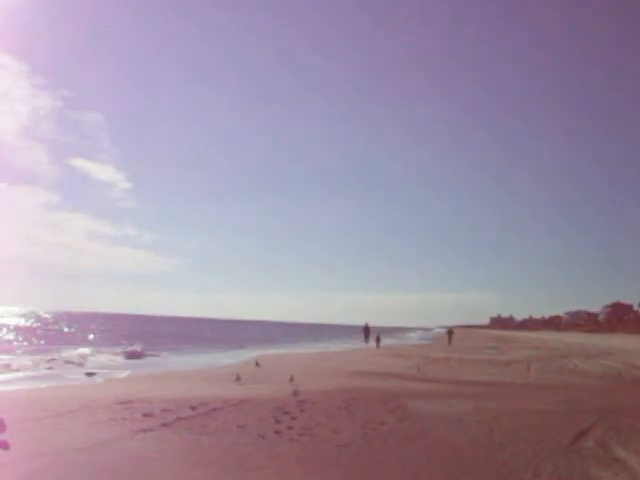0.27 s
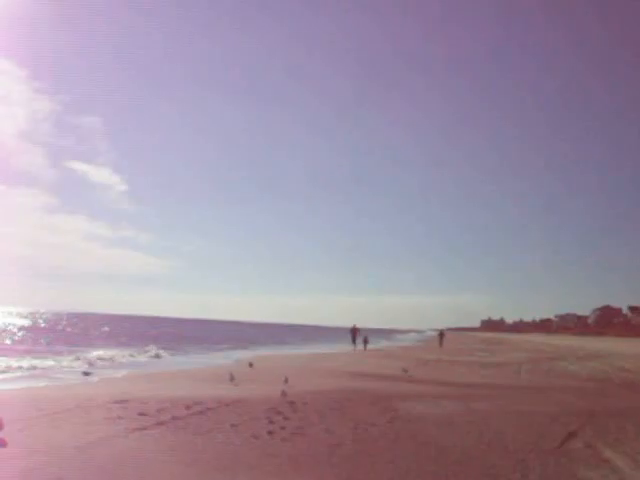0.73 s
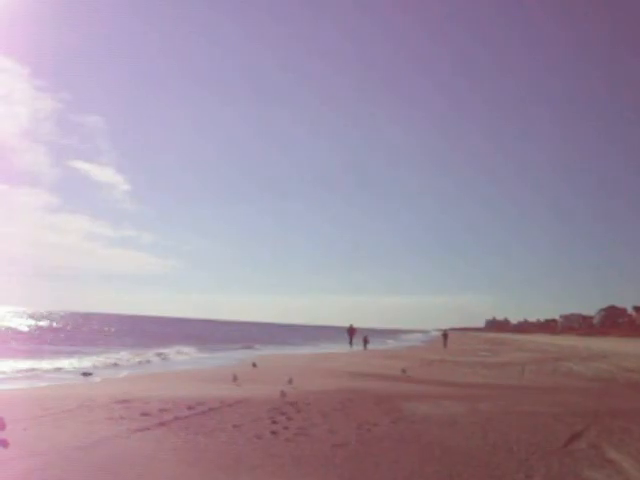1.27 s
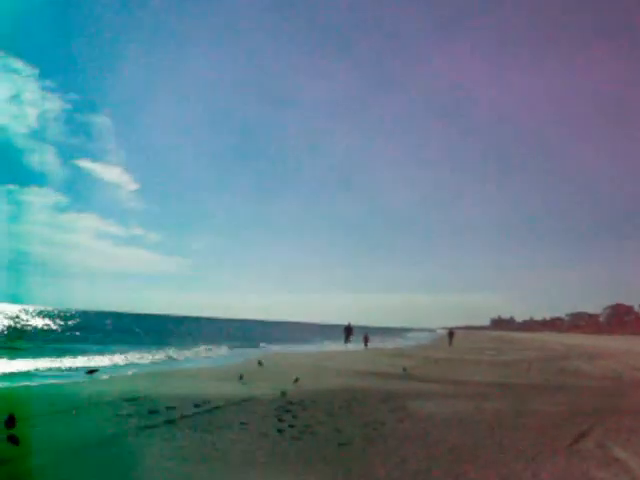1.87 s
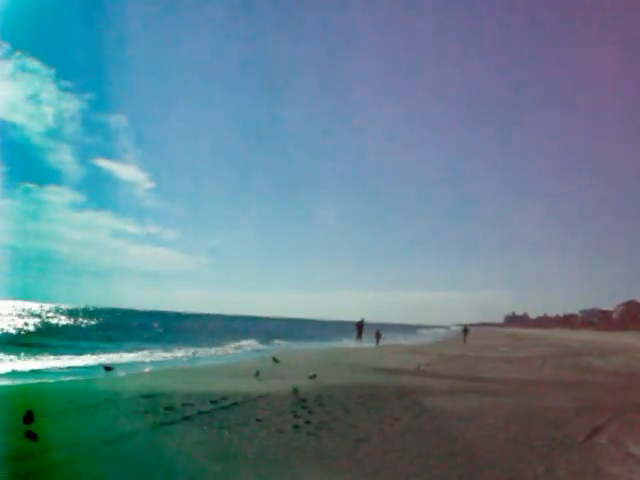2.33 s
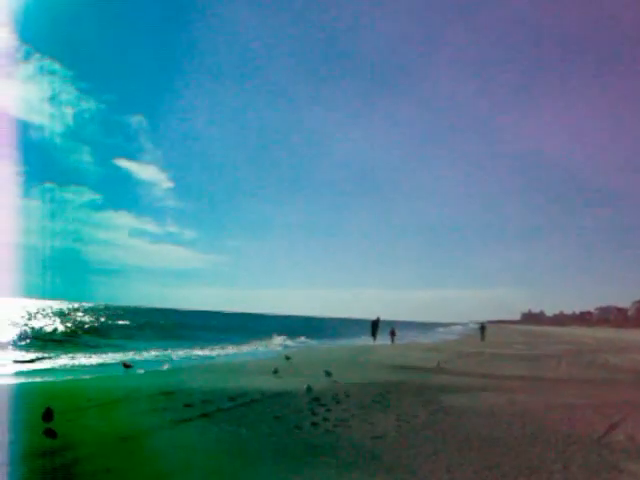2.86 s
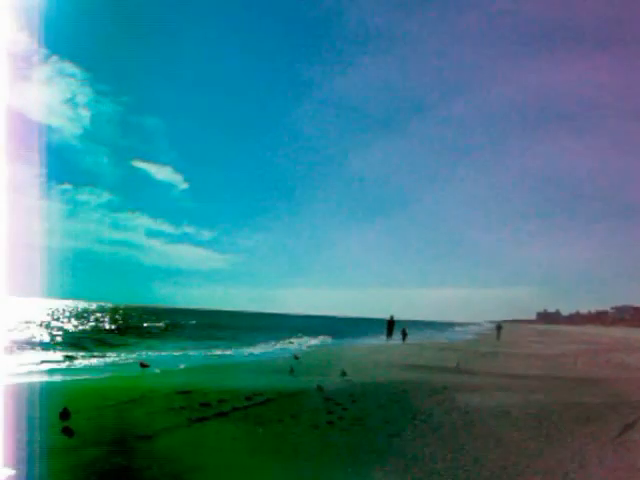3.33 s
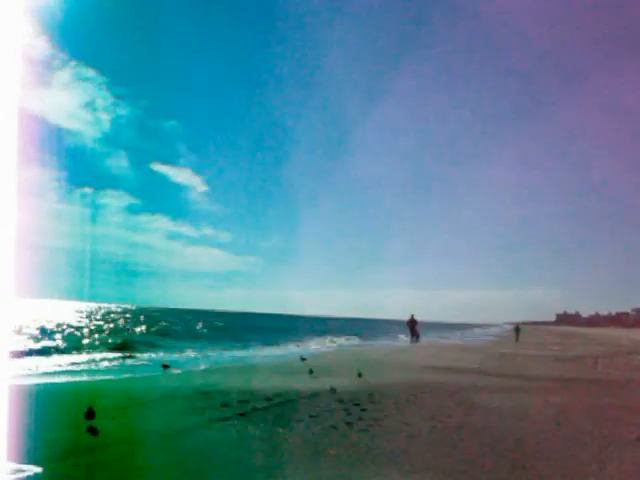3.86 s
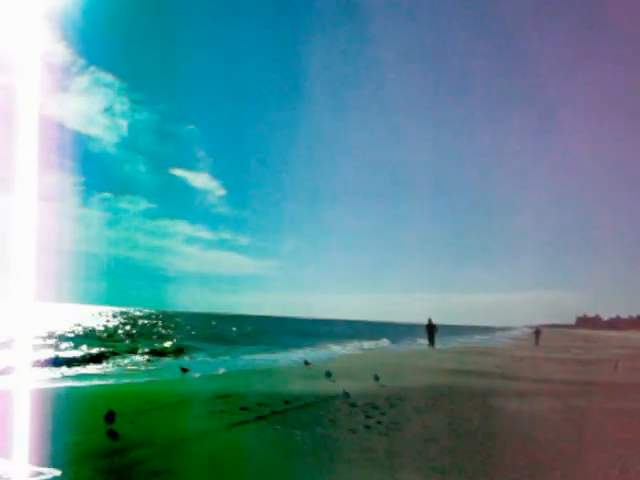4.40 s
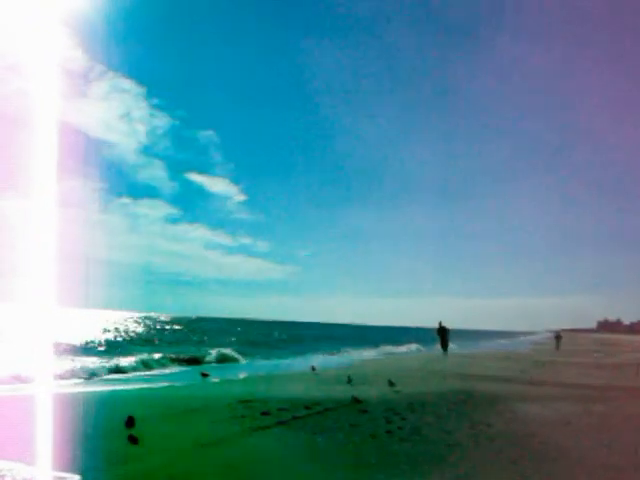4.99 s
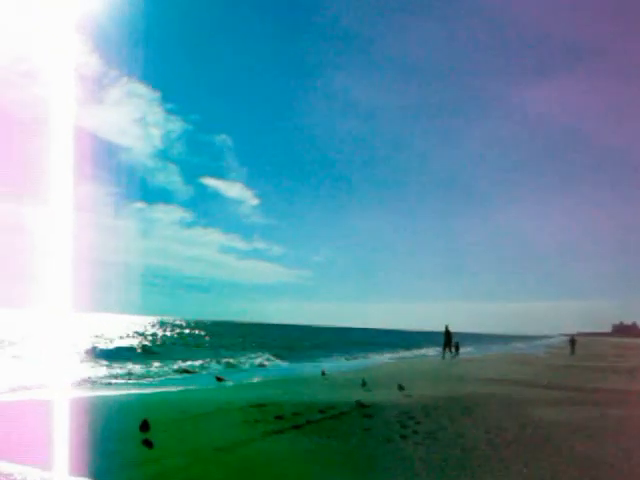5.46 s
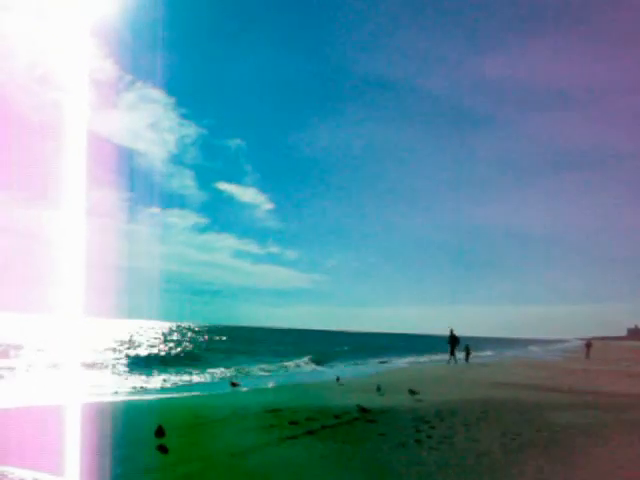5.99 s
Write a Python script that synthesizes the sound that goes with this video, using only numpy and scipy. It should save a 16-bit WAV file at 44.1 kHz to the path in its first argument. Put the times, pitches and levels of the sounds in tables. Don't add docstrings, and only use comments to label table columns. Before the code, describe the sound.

Low wind buffeting and knocks over foamy waves that ebb, then swell again with bubbly splashes; two brief, high bird calls pass.

```python
import sys
import numpy as np
from scipy import signal
from scipy.fft import rfft, irfft
from scipy.io import wavfile
from scipy.ndimage import uniform_filter1d

SR = 44100
rng = np.random.default_rng(int(sys.argv[2]) if len(sys.argv) > 2 else 0)


def voltage_ratio(decibels):
    exponent = np.asarray(decibels, float) / 20
    return 10 ** exponent


def master(y):
    cut = np.clip(np.atleast_2d(y).T, -1, 1)
    pcm = np.round(cut * 32767)
    wavfile.write(sys.argv[1], SR, pcm.astype(np.int16))


N = 274280

# time in s, force of the wave in dB, gurgle of the backwash in dB.
WAVES = [(0, -22.5, 2), (.4, -25.5, -2.5), (.62, -22, 3), (.95, -27.5, 2), (1.35, -31, -2),
         (2.0, -32.5, -2), (2.6, -34, -1), (2.95, -34.5, 1), (3.45, -30, 2.5), (3.9, -32, 3),
         (4.33, -29.5, 2), (4.602, -23.5, 3), (4.9, -21, 1.5), (5.25, -19.5, 0.5), (5.55, -21, 1),
         (5.68, -23, -3.5), (5.9, -17.5, 3.5), (6.22, -21, 1)]
# low edge in Hz, high edge in Hz.
SURF_BANDS_HZ = [(280, 600), (700, 1300), (2200, 3400), (4900, 5400)]
# level in dB at middle force, share of force followed, share of gurgle followed.
BAND_RESPONSES = [
    (-30, 1.01, -.8),
    (-31, 0.95, .5),
    (-39, 1.084, -.3),
    (-51.5, 0.65, 0.1),
]
# frequency in Hz, density in dB per Hz.
FOAM_COLOUR = [(65, -37), (110, -3.5), (130, -4), (171, 1), (258, -2.5), (357, -2.5), (797, -10),
               (1090, -9), (1530, -18.5), (2090, -14), (2510, -17.5), (3260, -16.5), (3710, -24.5),
               (4990, -34), (5500, -36.5), (7150, -71), (12100, -120)]
# time in s, lift in dB, centre in Hz, length in s, spread in octaves.
SLAPS = [(0.08, 1, 1200, 0.086, 1.1), (0.572, -3.5, 1200, 0.27, 0.83), (1.2, 2.5, 300, .1, 0.84),
         (1.957, 6, 800, .1, .7), (5.088, 1, 250, 0.29, 0.73), (2.846, 3, 2000, 0.11, 1.1),
         (3.025, 4.5, 1800, 0.17, 1.9), (3.374, 3, 2500, 0.13, 1.46), (3.708, 3, 1500, 0.082, 1.3),
         (4.103, 3.5, 3000, 0.2, 1), (4.41, 6.5, 3500, 0.18, 1.3), (5.425, 7.5, 4770, 0.15, 0.49),
         (5.48, 4.5, 4800, 0.083, 0.42), (5.766, 2, 2500, .08, 0.73), (5.99, 3, 2600, 0.084, 0.87),
         (6.1, 3, 900, 0.12, .8), (5.12, 1, 3000, 0.13, 0.47), (0.022, 2.5, 3270, 0.31, 0.55),
         (4.57, 3, 2500, 0.056, 0.73), (6.06, 2.5, 150, .15, 0.54), (3.47, 0.5, 1500, 0.065, 1)]
# time in s, peak
# in dB, length in s, sharpness of the buffeting in dB.
GUSTS = [(0.058, -18.5, 0.21, 1.5), (0.388, -17.5, 0.084, 0.5), (0.565, -19.5, 0.1, -1),
         (0.695, -16, .08, -16), (0.854, -16.5, 0.061, -4.5), (1.141, -13.5, 0.051, -2.5),
         (1.22, -20, 0.095, 5), (1.403, -24.5, .14, -1), (1.551, -16.5, 0.034, -13),
         (1.74, -22.5, .18, -9.5), (1.95, -24.5, 0.15, -2.5), (2.182, -23, 0.049, -6),
         (2.32, -21, .05, -3.5), (2.59, -25.5, 0.1, -11), (2.716, -21, 0.054, -3),
         (2.831, -18.5, .05, -4.5), (2.952, -20, 0.047, -5), (3.085, -21, 0.087, -4.5),
         (3.284, -21, 0.1, -5), (3.475, -13.5, 0.052, -9), (3.77, -22, .1, -11), (3.95, -20.5, 0.14, -12.5),
         (4.042, -9, 0.025, -15), (4.193, -12, 0.033, -21), (4.651, -16, 0.16, -3.5),
         (5.04, -20, 0.034, -7), (5.206, -30, 0.39, 6.5), (5.479, -15, 0.1, -4), (5.662, -14.5, 0.11, 0),
         (6.08, -23.5, 0.52, 2.5)]
# frequency in Hz, density in dB per Hz.
WIND_COLOUR = [(3, -39.5), (8, 2), (25, 3.5), (60, -3.5), (120, -9.5), (250, -24), (500, -44.5),
               (1500, -110)]
# time in s, peak in dB, pitch in Hz, length in cycles.
BUFFETS = [(0.369, -4, 64, 0.87), (0.858, -21, 62.4, 0.68), (1.194, -1, 124, 1.27), (1.213, -0.5, 106, 1.2),
           (1.279, -25, 98, 1.1), (2.838, -26, 145, 0.79), (3.47, -20, 88.8, 1.6),
           (4.031, -7.5, 75.4, 2.06), (4.643, -4.5, 61.9, 1.7), (5.501, -11, 70.0, 1.5),
           (5.608, -4, 70, 1.4), (5.629, 0, 105, 0.5), (5.664, -2.5, 61.9, 1.3)]
# time in s, peak in dB, pitch in Hz, slosh in dB, spray in dB.
SPLASHES = [(0.02, -20, 870, -14, -35), (1.969, -22, 802, -34, -30), (3.054, -12, 840, -6, -17.5),
            (3.07, -10, 990, -9, -17), (3.176, -14, 1120, -9, -29), (3.398, -13.5, 800, -5, -13),
            (3.405, -10.5, 1130, -27, -11.5), (3.474, -10.5, 970, -20, -19), (3.555, -13, 1070, -17, -23),
            (3.699, -13, 1140, -15, -18), (3.853, -15, 956, -9, -31), (3.989, -12, 870, -11, -13),
            (4.547, -10, 1100, -19, -35), (5.701, -8, 912, -15, -25), (5.759, -6.5, 780, 1, -39),
            (5.914, -2, 840, -25, -41), (6.057, -1.5, 926, -18, -35)]
# start in s, length in s, pitch in Hz, level in dB, glide in Hz.
NOTES = [
    (1.592, 0.041, 3630, -31, -8),
    (1.632, 0.0834, 3810, -30.5, -70),
    (1.714, 0.096, 4580, -34.5, 94),
    (1.788, 0.031, 4000, -45, -120),
    (1.802, 0.16, 3880, -34, -90),
    (3.965, 0.054, 3590, -34.5, -200),
    (4.014, .078, 3940, -19, -95),
    (4.088, .125, 4703, -36.5, 45),
    (4.17, 0.042, 4120, -35.5, -61.5),
    (4.194, 0.15, 3946, -24.5, -175),
]
# flick at the start in Hz, its time in s, flick at the end in Hz, its time in s.
BENDS = [
    (16.2, .005, 254, 0.0029),
    (260, 0.012, 417, .007),
    (45, .008, 50, 0.016),
    (30, .006, -20, .006),
    (70, .015, -230, 0.032),
]
# rise in s, fade in s, sag in dB, octave below in dB.
SWELLS = [
    (.012, 0.0084, -10, -26),
    (0.014, 0.011, 1.5, -12),
    (.006, 0.011, 9.5, -34),
    (.012, .008, -4, -33),
    (0.029, 0.081, -4, -32),
]
# time in s, peak in dB, rise in s, fall in s, tail in dB, tail in s.
THUMPS = [
    (4.6807, -6, 0.001, .0008, -17, 0.0021),
    (5.59375, 4, 0.00085, 0.00042, -11.5, 0.002),
]
# time in s, depth in dB, recovery in s.
GAIN_DIPS = [
    (4.681, 12.5, 0.012),
    (5.5945, 7.5, 0.029),
    (3.1, 0.5, 0.047),
]
OVERFLOWS_S = (5.59338, 5.59392)


def evened(x):
    return x / np.sqrt(np.mean(x ** 2) + 1e-20)


def levelled(x, width):
    power = uniform_filter1d(uniform_filter1d(x ** 2, int(width)), int(width))
    return x / np.sqrt(power + 0.055)


def read(points, hz):
    f, value = np.transpose(points)
    return np.interp(np.log(hz + 1), np.log(f + 1), value)


def add(mix, start_s, sound):
    part = mix[round(start_s * SR):][:len(sound)]
    part += sound[:len(part)]


def drift(shape, *widths):
    x = rng.standard_normal(shape)
    for axis, width in enumerate(widths):
        for _ in range(2):
            x = uniform_filter1d(x, int(width), axis)
    return evened(x)


def noise(field_db, size):
    z = rng.standard_normal(field_db.shape) + 1j * rng.standard_normal(field_db.shape)
    return signal.istft((z * voltage_ratio(field_db)).T, nperseg=size, noverlap=size * 3 // 4)[1][:N]


def bubble(hz, cycles, glide=0.21):
    u = np.arange(int(3 * cycles * SR / hz)) * hz / SR
    envelope = (1 - np.exp(-u * 3)) * np.exp(-u / cycles * 2)
    return envelope * np.sin(2 * np.pi * (u + glide * u ** 2 / cycles / 2))


def foam_swell(t, hz, colour_db):
    middle_db, slap_rise_s = -28, 0.014
    wave_s, force_db, gurgle_db = np.transpose(WAVES)
    courses = []
    for (low_hz, high_hz), (db, force_share, gurgle_share) in zip(SURF_BANDS_HZ, BAND_RESPONSES):
        level_db = db + force_share * (force_db - middle_db) + gurgle_share * gurgle_db
        inside = (hz >= low_hz) & (hz < high_hz)
        own_power = np.sum(voltage_ratio(2 * colour_db[inside])) * (high_hz - low_hz) / np.sum(inside)
        courses.append(np.interp(t, wave_s, level_db - 10 * np.log10(own_power)))
    centres_hz = np.sqrt(np.prod(SURF_BANDS_HZ, axis=1))
    share = np.array([read(np.c_[centres_hz, row], hz) for row in np.eye(len(centres_hz))])
    swell_db = np.array(courses).T @ share
    for start_s, lift_db, centre_hz, length_s, octaves in SLAPS:
        rise = np.clip((t - start_s) / slap_rise_s + 1, 0, 1)
        shape = rise * np.exp(-(np.maximum(t - start_s, 0) / length_s) ** 3)
        spread = np.exp(-(np.log2((hz + 1) / centre_hz) / octaves) ** 2)
        swell_db += lift_db * np.outer(shape, spread)
    return swell_db


def surf(patchy_db=-0.5, flicker_db=0.05, grain_db=-9.0, grains_per_s=150, grain_spread_db=2.0):
    frames, hz = N // 128 + 5, np.fft.rfftfreq(512, 1 / SR)
    t = np.arange(frames) * 128 / SR
    colour_db = np.where(hz < SR / 8, read(FOAM_COLOUR, hz), -120)
    swell_db = foam_swell(t, hz, colour_db)
    patches_db = patchy_db * drift((frames, len(hz)), 12, 3.5)
    flicker = flicker_db * drift((frames, len(hz)), 2.6, 22)
    foam = evened(noise(patches_db + flicker, size=512))
    for pitch_hz in np.geomspace(500, 4800, 24):
        bursts = rng.random(N) < grains_per_s / 24 / SR
        sizes = voltage_ratio(grain_spread_db * np.minimum(rng.exponential(1, N), 4)) * bursts
        foam += voltage_ratio(grain_db) * signal.oaconvolve(sizes, bubble(pitch_hz, 4.4))[:N]
    z = signal.stft(foam, nperseg=512, noverlap=384)[2]
    z *= voltage_ratio(colour_db + swell_db[:z.shape[1]]).T * np.sqrt(SR / 2)
    return signal.istft(z, nperseg=512, noverlap=384)[1][:N]


def wind(lumps_db=3.0, split_hz=60.0, buffet_db=-2.0):
    gust_edge_db, breeze_db, flutter_db = 4.5, -32.5, -35
    hz, t = np.fft.rfftfreq(N, 1 / SR), np.arange(N) / SR
    z = rfft(rng.standard_normal(N)) * voltage_ratio(read(WIND_COLOUR, hz))
    upper = 1 / (1 + (split_hz / (hz + 1)) ** 6)
    low = levelled(evened(irfft(z * (1 - upper), N)), 1200)
    high = levelled(evened(irfft(z * upper, N)), 1200)
    lumps = voltage_ratio(lumps_db * drift(N, 790))
    push, flutter = voltage_ratio(2 * breeze_db), voltage_ratio(2 * flutter_db)
    for s, db, length_s, sharp_db in GUSTS:
        power = voltage_ratio(2 * (db - gust_edge_db * abs(2 * (t - s) / length_s) ** 1.3))
        push = push + power
        flutter = flutter + power * voltage_ratio(2 * sharp_db)
    out = np.sqrt(push) * low + np.sqrt(flutter) * evened(high * lumps)
    for s, db, pitch_hz, cycles in BUFFETS:
        u = np.arange(int(cycles * SR / pitch_hz)) * pitch_hz / SR
        under = out[round(s * SR):][:len(u)]
        kick = voltage_ratio(db + buffet_db) * np.cos(2 * np.pi * u)
        add(out, s, np.hanning(len(u)) * (kick - under))
    return out


def splashes():
    out, t = np.zeros(N), np.arange(900) / SR
    dull = signal.butter(5, [600, 3300], "band", fs=SR, output="sos")
    bright = signal.butter(4, [3600, 5200], "band", fs=SR, output="sos")
    envelope = (1 - np.exp(-t / 0.00075)) * np.exp(-t / 0.006)
    for s, db, hz, slosh_db, spray_db in SPLASHES:
        add(out, s, voltage_ratio(db) * bubble(hz, cycles=3.0))
        burst = rng.standard_normal(len(t))
        slosh = voltage_ratio(slosh_db) * evened(signal.sosfilt(dull, burst))
        spray = voltage_ratio(spray_db) * evened(signal.sosfilt(bright, burst))
        add(out, s, voltage_ratio(db - 6.0) * (slosh + spray) * envelope)
    return out


def bird():
    edge_db, waver_db = 16, 0.8
    out = np.zeros(N)
    for note, bend, swell in zip(NOTES, [*BENDS, *BENDS], [*SWELLS, *SWELLS]):
        start_s, length_s, hz, db, glide_hz = note
        in_hz, in_s, out_hz, out_s = bend
        rise_s, fade_s, sag_db, under_db = swell
        t = np.arange(0, length_s, 1 / SR)
        along, left = t / length_s - .5, length_s - t
        flicks_hz = in_hz * np.exp(-t / in_s) + out_hz * np.exp(-left / out_s)
        phase = 2 * np.pi * np.cumsum(hz + glide_hz * along + flicks_hz) / SR
        under = signal.windows.tukey(len(t), .45) * np.linspace(.05, 1.2, len(t)) * np.sin(phase / 2)
        tone = np.sin(phase) + voltage_ratio(under_db) * under
        edges = np.maximum(1 - t / rise_s, 0) ** 2 + np.maximum(1 - left / fade_s, 0) ** 2
        level_db = db + waver_db * drift(len(t), 150) - sag_db * along - edge_db * edges
        add(out, start_s, np.sqrt(2) * voltage_ratio(level_db) * tone * signal.windows.tukey(len(t), .12))
    return out


def shore(x, echo_db=-17.0, t60_s=0.12):
    t = np.arange(SR // 8) / SR
    scattered = rng.standard_normal(len(t)) * (rng.random(len(t)) < .03)
    taps = scattered * voltage_ratio(-60 * t / t60_s) * (t > .004)
    return x + voltage_ratio(echo_db) * signal.oaconvolve(x, taps / np.linalg.norm(taps))[:N]


def thump(s, db, rise_s, fall_s, tail_db, tail_s):
    t = np.arange(N) / SR - s
    after = np.maximum(t, 0)
    tail = voltage_ratio(tail_db)
    settle = (1 - tail) * np.exp(-(after / fall_s) ** 2) + tail * np.exp(-after / tail_s)
    return voltage_ratio(db) * np.exp(np.minimum(t, 0) / rise_s) * settle


def gain_dips_db():
    t = np.arange(N) / SR
    dip_db = np.zeros(N)
    for s, db, recovery_s in GAIN_DIPS:
        dip_db += db * (t > s) * np.exp(-(np.maximum(t - s, 0) / recovery_s) ** 2)
    return uniform_filter1d(dip_db, 40)


def scene():
    t = np.arange(N) / SR
    dip_db = gain_dips_db()
    lull_s = .006
    lull = 1 - sum(np.exp(-((t - row[0]) / lull_s) ** 2) for row in THUMPS)
    beach = (surf() + splashes() + shore(bird())) * voltage_ratio(-dip_db)
    flow = lull * wind() * voltage_ratio(-.6 * dip_db)
    knocks = sum(thump(*row) for row in THUMPS)
    return (beach + flow + knocks)[None]


def top_cut(x):
    return signal.sosfilt(signal.butter(12, 15500, fs=SR, output="sos"), x)


def record(dry):
    step, ceiling, bias, hiss_db = 4, .95, .0285, -49.5
    coarse = dry[0, ::step] + bias
    hiss = voltage_ratio(hiss_db) * rng.standard_normal(len(coarse))
    coarse = np.clip(coarse + hiss, -ceiling, ceiling)
    coarse[np.round(np.array(OVERFLOWS_S) * SR / step).astype(int)] = -ceiling
    spaced = np.zeros(N)
    spaced[::step] = step * coarse
    smooth = signal.firwin(65, 5480, window=("kaiser", 9.), fs=SR)
    stretched = np.convolve(np.pad(spaced, 32, "reflect"), smooth, "valid")
    return top_cut(np.clip(stretched, -1, 1)[None])


dry = scene()
out = record(dry)
master(out)
```